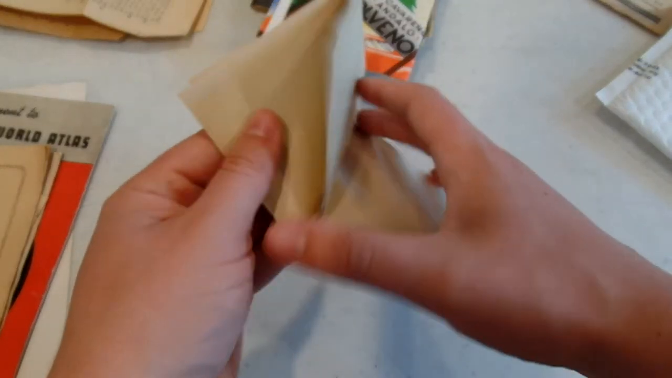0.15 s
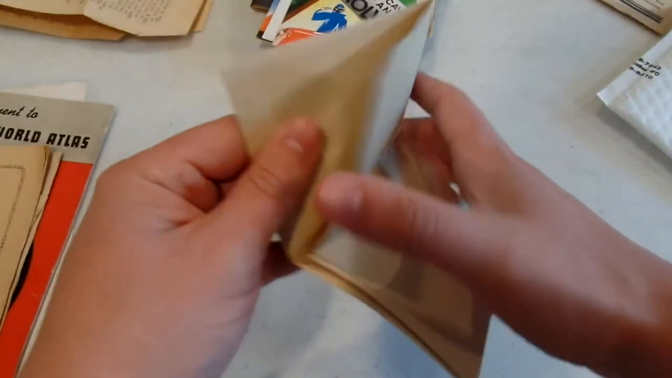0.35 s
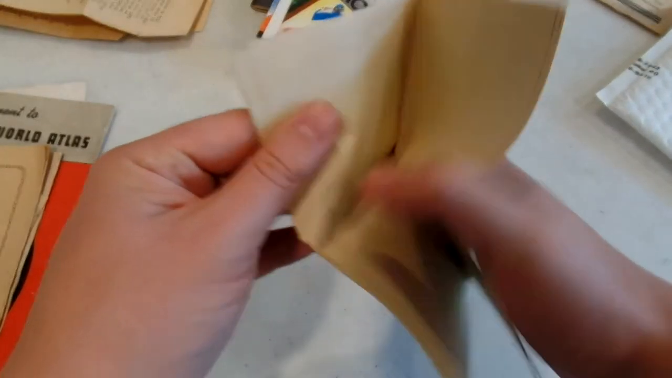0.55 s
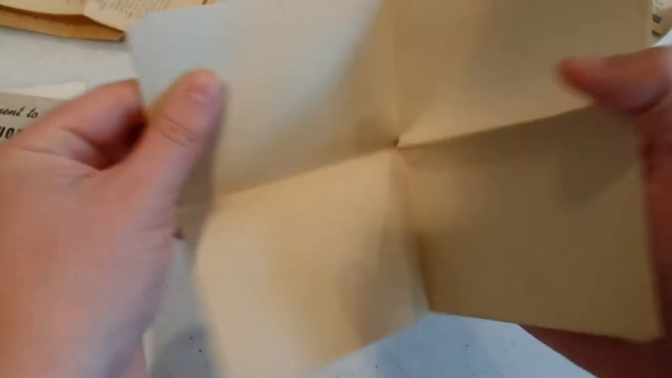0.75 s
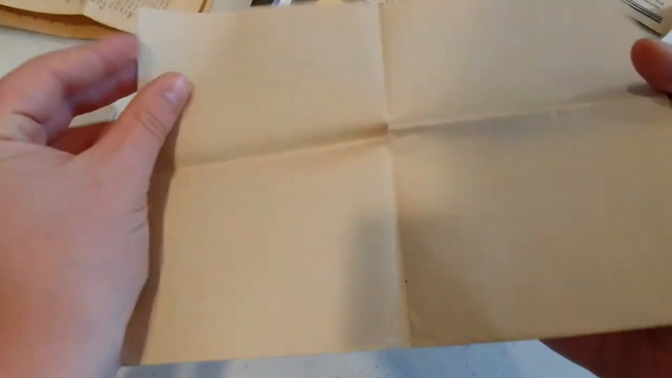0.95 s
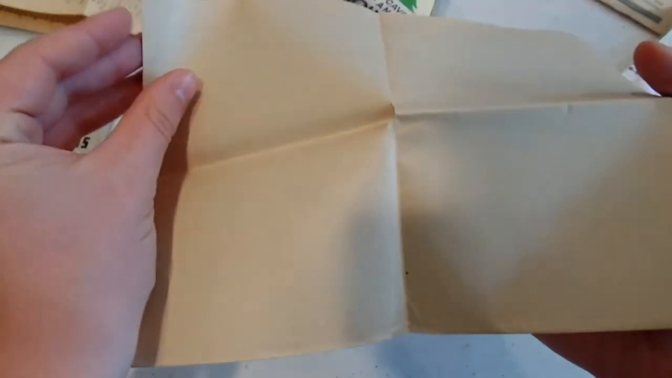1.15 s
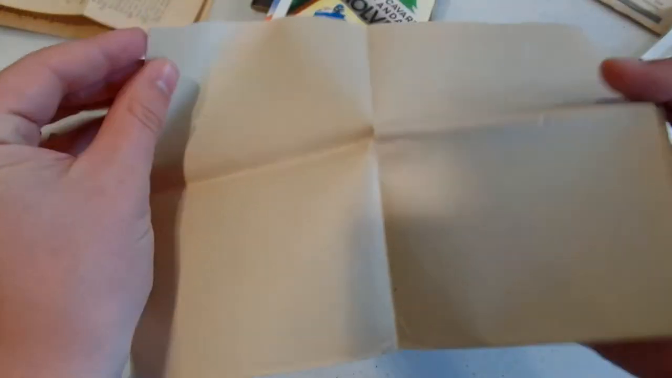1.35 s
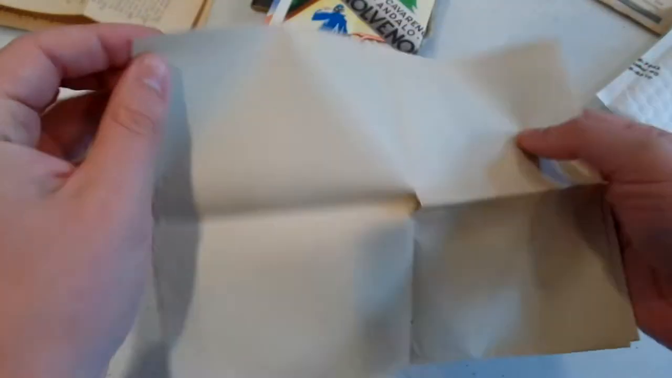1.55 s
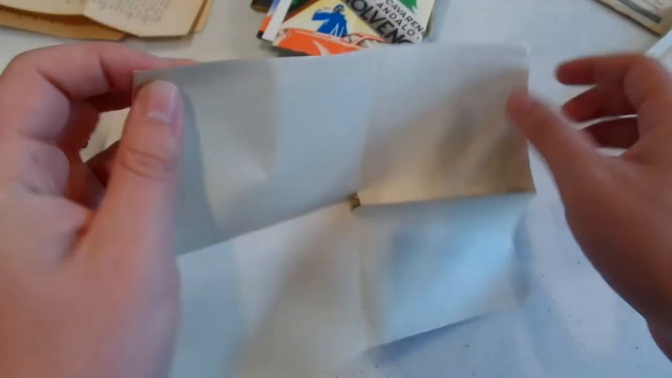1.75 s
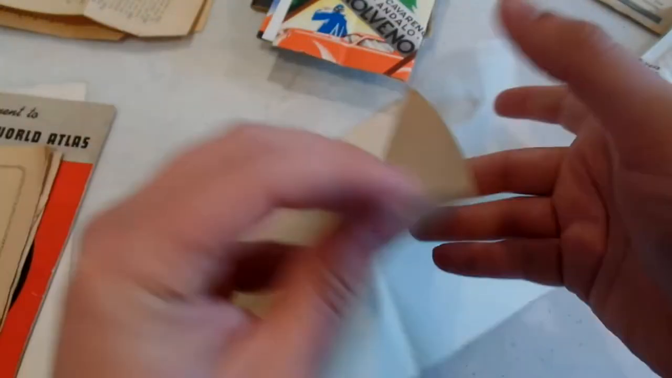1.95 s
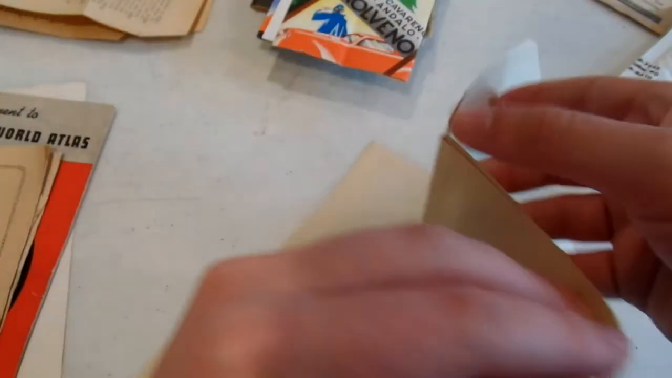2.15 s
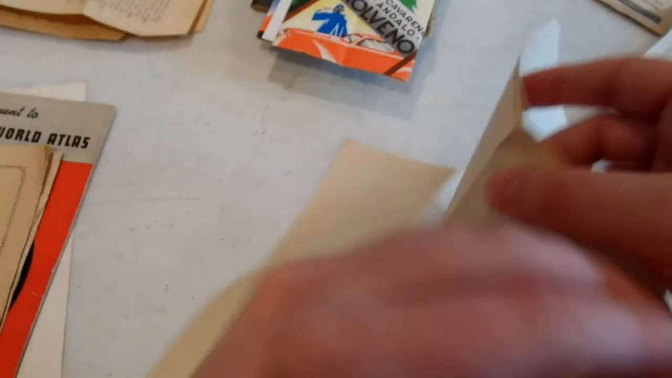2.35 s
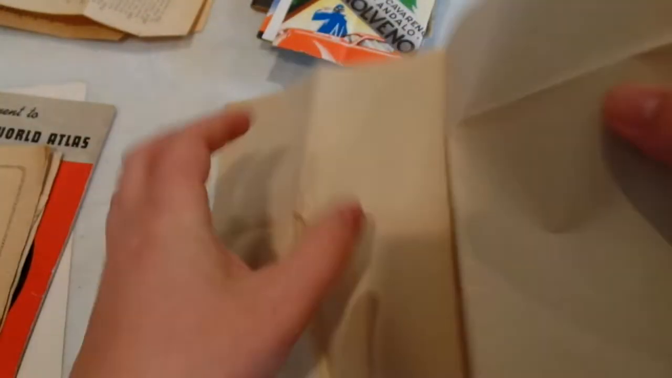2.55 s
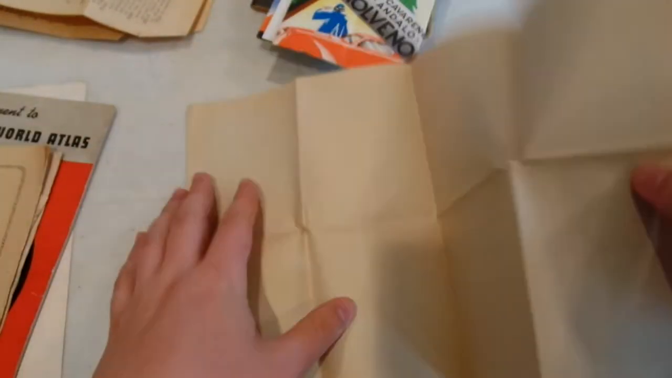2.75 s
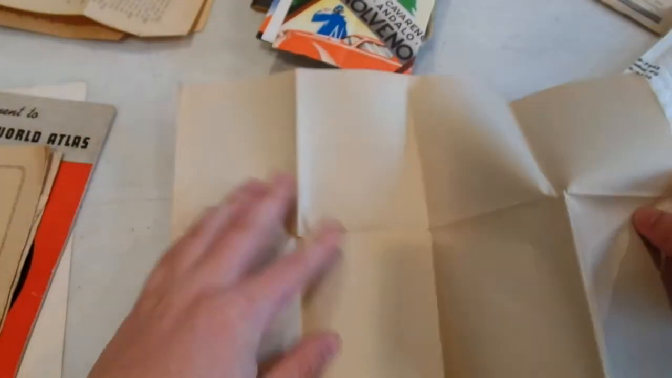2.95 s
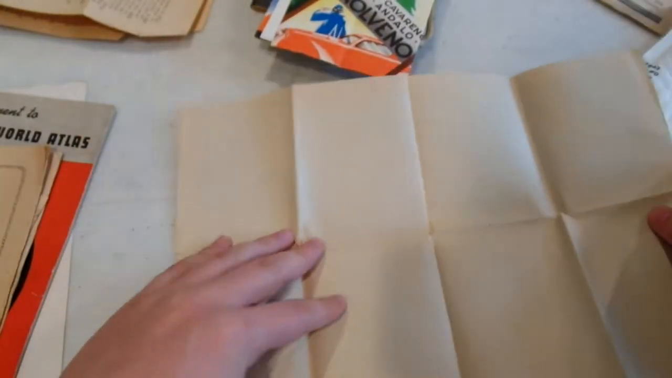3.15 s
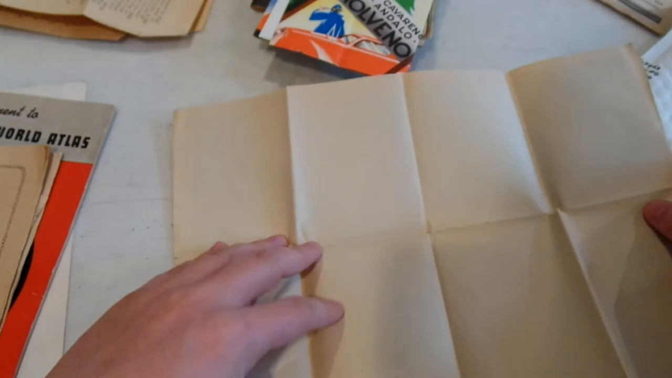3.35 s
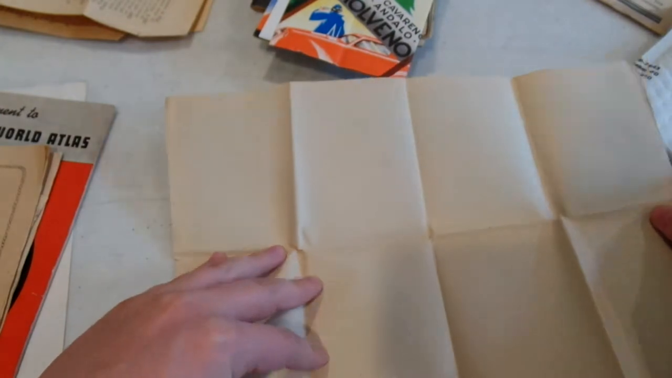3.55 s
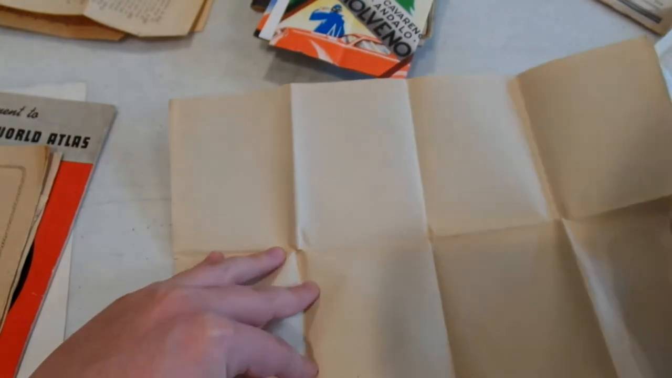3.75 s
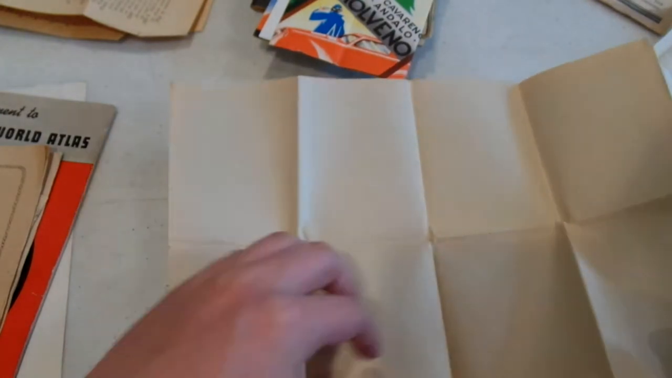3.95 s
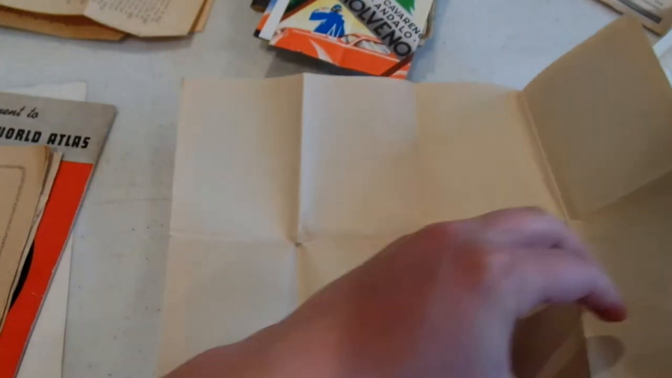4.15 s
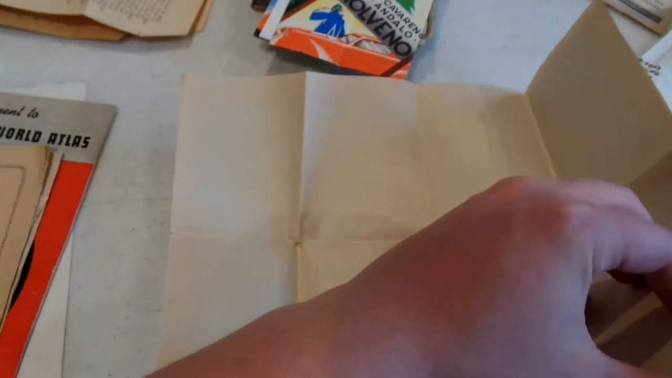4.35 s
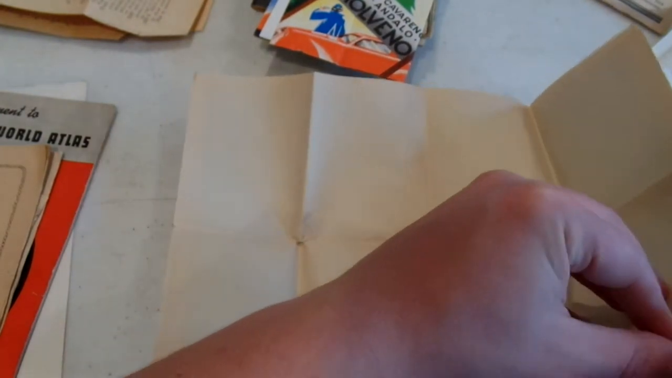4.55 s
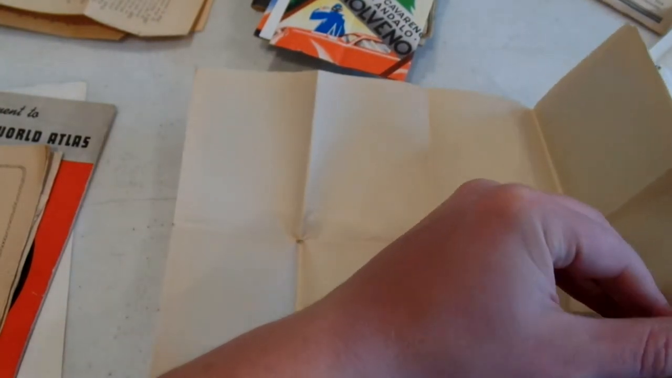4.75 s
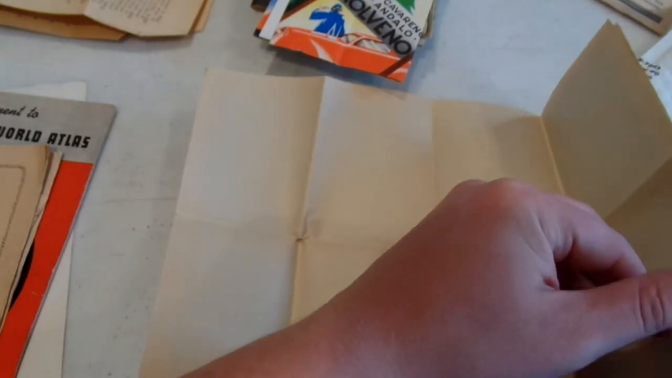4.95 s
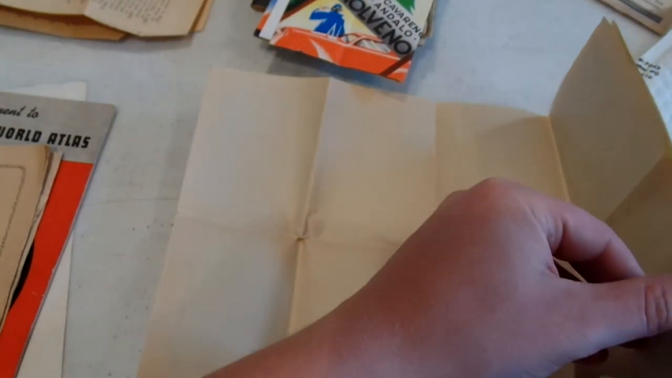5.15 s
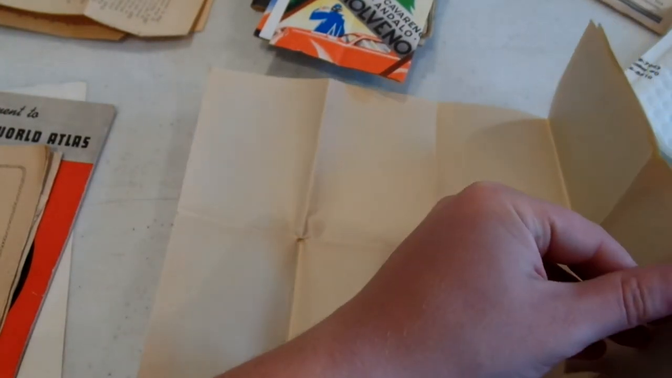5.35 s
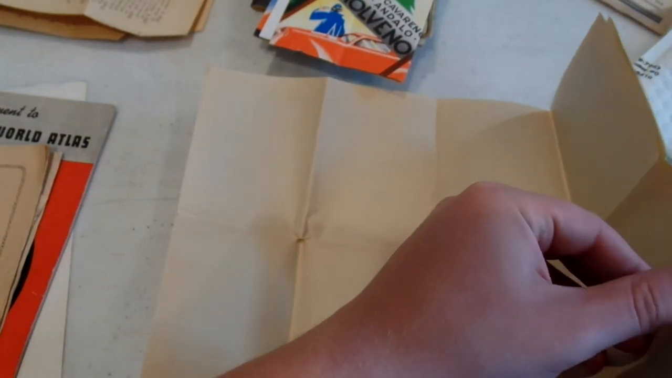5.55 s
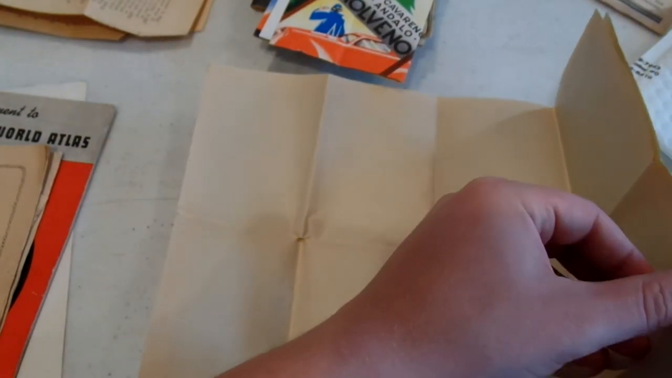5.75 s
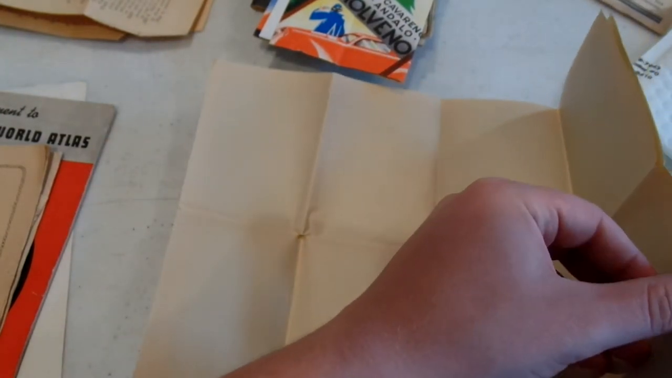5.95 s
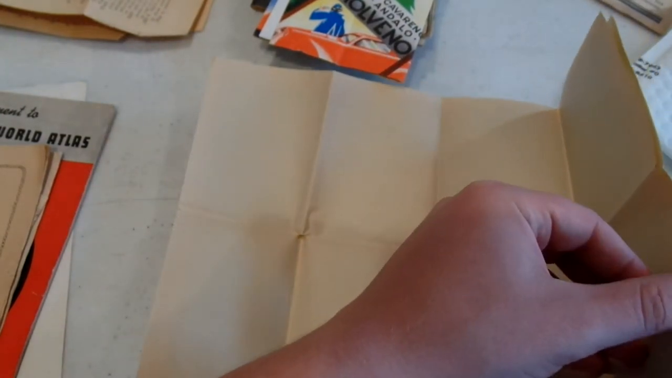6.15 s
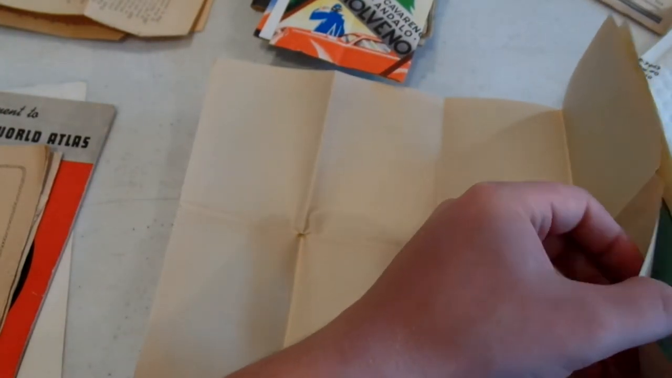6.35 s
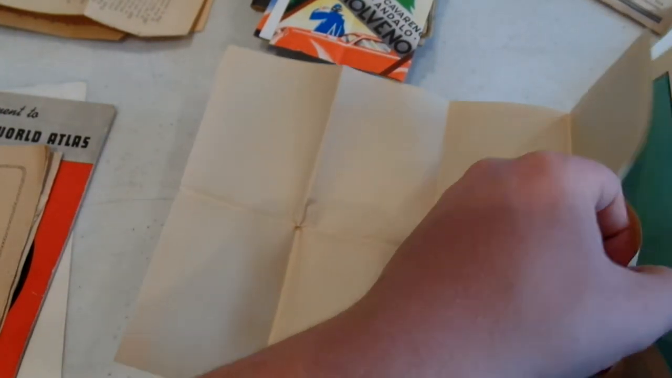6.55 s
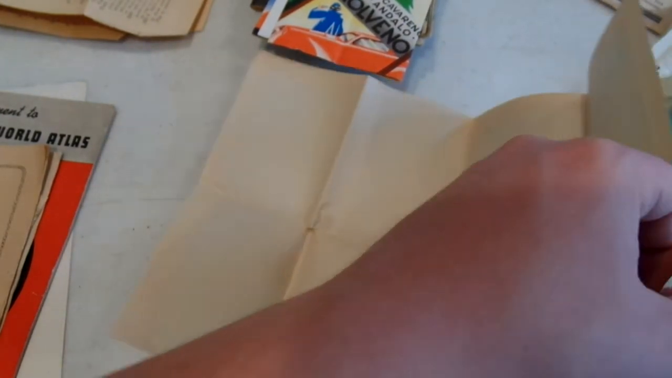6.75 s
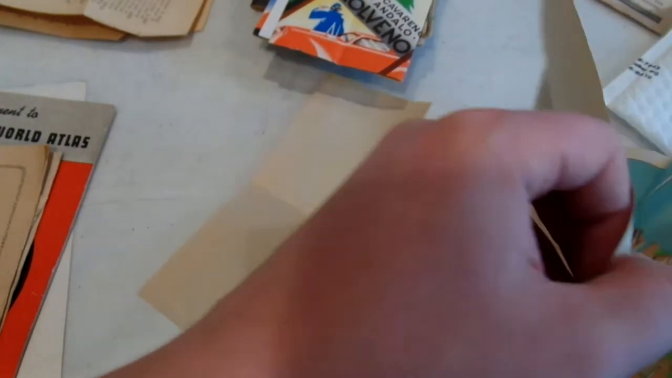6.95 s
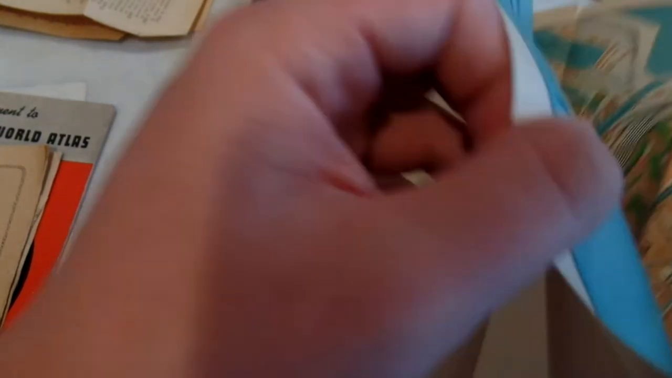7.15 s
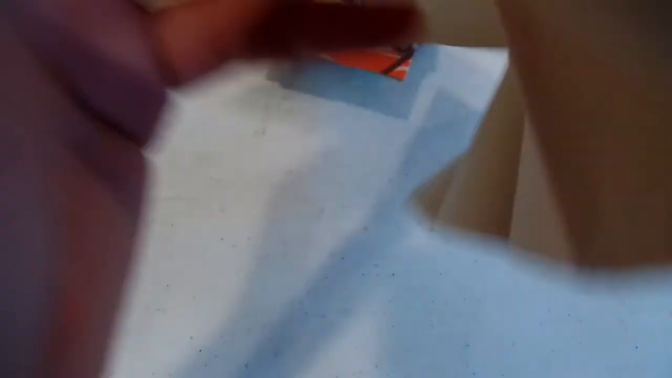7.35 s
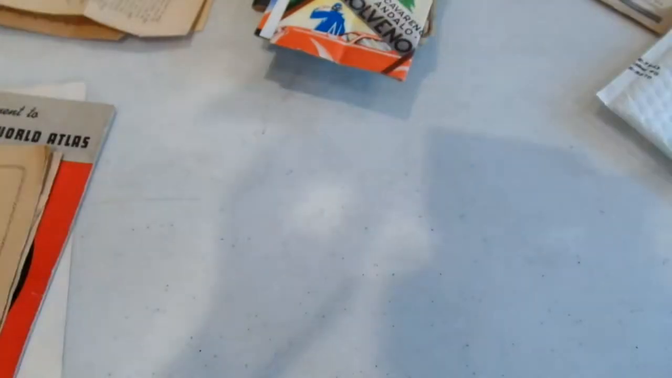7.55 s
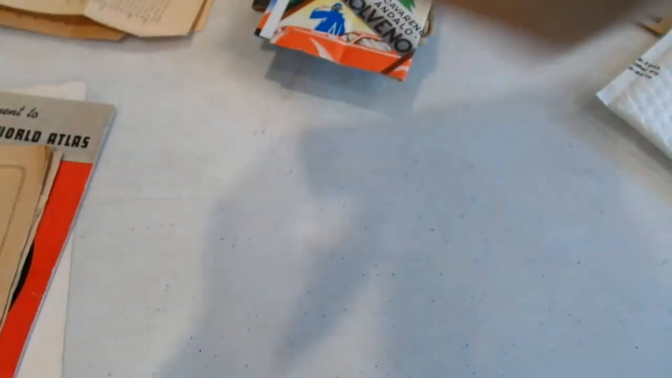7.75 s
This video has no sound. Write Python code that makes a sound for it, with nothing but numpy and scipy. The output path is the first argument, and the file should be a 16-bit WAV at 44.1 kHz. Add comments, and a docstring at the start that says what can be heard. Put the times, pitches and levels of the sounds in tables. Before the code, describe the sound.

Close dry paper rustling in fits and starts, with crisp crease pops, a brief fingertip squeak, a quiet lull and a busy crackly finish.

```python
"""Paper hisses and rustles stroke by stroke, with dry snaps, soft taps and short fingertip squeaks.
A folded sheet is opened out, smoothed on a table and lifted away, close to one microphone.
Friction is filtered noise with ticks; creases and taps are decaying noise bursts that excite resonances;
a skidding fingertip adds stick-slip tones. Swings of the sheet add low noise from fanned air and flexing.
A short diffuse reverberation and steady background noise make up the small quiet room."""
import sys
import numpy as np
from scipy import signal
from scipy.io import wavfile
from scipy.ndimage import uniform_filter1d

SR = 44100
rng = np.random.default_rng(int(sys.argv[2]) if len(sys.argv) > 2 else 0)


def digitize_waveform(pressure):
    """Quantize a signal to 16-bit integers and store it at the path in sys.argv[1].

    Rows of a 2-D input are taken as channels; values are limited to [-1, 1].
    """
    field = np.atleast_2d(pressure).T
    bounded = np.clip(field, -1, 1)
    quanta = np.round(bounded * 32767).astype(np.int16)
    wavfile.write(sys.argv[1], SR, quanta)


N = 344421
TIME = np.arange(N) / SR  # s

# Table levels are relative: each source may add its own trim in dB.
# Strokes of paper over paper, skin or table: [start t/s, rise t/s, hold t/s, time to fall by 20 dB t/s,
# friction level/dB, fizz re friction level/dB, hollow body re friction level/dB].
# The folds are pulled open; from 2.65 s the sheet is laid down and smoothed; from 4.56 s the fingers
# feel for a grip on the edge; from 6.45 s the sheet is gathered up and lifted away.
STROKES = [ (0.0, 0.00167, 0.0155, 0.36, -40, -3, -4.5), (0.084, 0.041, 0.018, 0.3, -44, -3, -3.5),
           (0.17, 0.056, 0.14, 0.2, -46.5, 1.5, -3.5), (0.372, 0.053, 0.046, 0.3, -45, -11, -8),
           (0.493, 0.022, 0.047, 0.14, -38, -4, -8), (0.647, 0.096, 0.062, 0.24, -42, -4, -4),
           (0.82, 0.0368, 0.0578, 0.1158, -39.5, 1.5, -6), (0.929, 0.086, 0.1503, 0.07, -42.5, -6.5, -8.5),
           (1.242, 0.13, .045, 0.43, -38, -4, -4.5), (1.444, 0.057, 0.009, 0.1053, -32.5, -2.5, -10),
           (1.533, 0.0613, 0.0618, .13, -33, -4.5, -4), (1.717, 0.034, 0.051, 0.26, -42.5, -2.5, -4.5),
           (1.924, 0.12, 0.025, 0.3253, -41.5, -4.5, -2), (2.12, 0.0436, 0.0195, .33, -44.5, -1.5, -4.5),
           (2.285, 0.024, 0.2164, 0.18, -40.5, -4, -4.5), (2.653, 0.057, 0.072, 0.21, -36.5, -6, 0.5),
           (2.858, 0.0593, 0.085, .18, -36.5, -6, -5), (3.046, 0.067, 0.12, 0.4, -43.5, -4, -1),
           (3.257, .015, .015, .09, -39.5, -4, -14), (3.337, 0.1, 0.075, 0.24, -39.5, -4, -3),
           (3.559, 0.082, 0.076, 0.2, -47, -8, -1), (3.802, 0.035, .06, 0.17, -43, -4.5, -1.5),
           (4.297, 0.058, 0.018, 0.06, -44, -9, -8), (4.395, 0.0428, 0.068, .17, -41, -7, -6),
           (4.56, 0.024, 0.21, 0.04, -56.5, -6, -2), (4.815, 0.055, .07, 0.35, -51.5, -6, -6),
           (5.076, 0.0376, 0.042, .1, -54, -11, 3), (5.193, 0.036, .008, 0.06, -50.5, -2.5, -7),
           (5.304, 0.0162, .003, 0.2, -52, -6.5, -1.5), (5.393, 0.007, 0.012, 0.1458, -39.5, 0, -3),
           (5.50, 0.017, 0.015, 0.2, -45, -7, -6), (5.634, .035, .012, 0.2, -48.5, -0.5, -5.5),
           (5.74, 0.018, .015, 0.24, -50.5, 1, -4), (5.873, 0.0191, 0.0075, 0.13, -41.5, -1.5, -4.5),
           (5.95, 0.027, .04, 0.12, -54.5, -10, -6), (6.052, 0.0263, .012, 0.04, -50.5, -2.5, -7),
           (6.194, .015, 0.035, .25, -58, -5.5, 2), (6.283, 0.018, 0.12, 0.35, -50, -3.5, -8),
           (6.446, 0.0104, 0.063, 0.1548, -35.5, -3, -6.5), (6.54, .01, .015, 0.15, -35, -4, -8),
           (6.621, .015, .005, .16, -30, -8, -7), (6.714, 0.048, .13, 0.2, -36, -3.5, -6),
           (6.91, 0.058, .085, 0.7, -39.5, -11, -0.5), (7.068, .11, .17, 0.0848, -32, -3, -3),
           (7.366, 0.028, 0.25, .16, -32.5, -5.5, -2.5)]
# The sheet never quite rests in the hand: [friction level/dB, fizz re friction level/dB,
# hollow body re friction level/dB]
HELD_SHEET = (-63, -5, 3.8)
# Spectrum of paper friction: [f/Hz, spectral density level/dB]
FRICTION_SPECTRUM = [(200, -7), (400, -0.5), (540, -4), (850, 1), (1200, -2), (1900, 0.5), (2600, -1),
                     (4000, 3.5), (7200, 1.5), (8200, 0), (9800, -7), (12000, -7), (14500, -1), (16000, -8)]
# The widest free panel, a resonance in the friction: [t/s, f/Hz, lift level/dB]
PANEL_RESONANCE = [(0, 2310, 2.5), (2.6, 2660, -0.5), (3.7, 2620, 10), (4.2, 2560, 0.5), (4.4, 3180, 3),
                   (6.4, 3130, 6), (7, 2680, 1)]
# Creases that buckle: [t/s, level/dB, panel ring f/Hz, thud level/dB, crack level/dB, decay constant t/s]
SNAPS = [(0.553, -32, 5500, -7.5, -18, .0057), (0.727, -32, 830, -2, -12, .0064),
         (0.7396, -35.5, 7550, -4, -5, 0.0025), (0.8869, -24, 8600, -1.5, 5, 0.00076),
         (1.3917, -30, 4000, -2.5, -3, 0.0042), (1.4854, -33, 3060, -18, -9, 0.0023),
         (1.5091, -19, 5300, -14, 1.5, 0.0021), (1.5709, -25.5, 960, 3, -11, 0.0018),
         (1.642, -34, 5000, -15.5, -7, 0.0023), (2.2517, -38, 2890, 5, -10.5, 0.0031),
         (2.3142, -33, 2610, -4, -14, .0046), (2.411, -40.5, 2480, -1, -8.5, 0.0027),
         (2.6731, -27.5, 1550, 1.5, -12, 0.0016), (2.721, -28, 2360, -14, -5, 0.0066),
         (2.7852, -23.5, 3180, -8, -8, 0.0029), (2.8126, -32, 1000, 8.5, -12, .0099),
         (2.8504, -22.5, 2990, -7, -3.5, 0.0031), (2.9421, -23.5, 8350, -10, 1, 0.0026),
         (2.981, -19, 2830, -5.5, -0.5, 0.0033), (3.2683, -24, 3800, -10.5, -4, 0.0021),
         (3.438, -25, 2600, 9, -10.5, .0054), (3.4927, -19.5, 2520, -14, -7.5, 0.0017),
         (3.8187, -22.5, 2605, -6.5, -12, 0.0068), (3.8974, -37.5, 2510, 0, -10, 0.003),
         (3.9424, -41.5, 2510, -6, -14, 0.0016), (4.116, -50, 2200, 2.5, -17, .004),
         (4.4795, -28.5, 3040, -7.5, -12, .0029), (4.735, -40.5, 2240, 3.5, -18, 0.003),
         (5.1227, -40, 3060, -3, -14.5, 0.0027), (5.403, -30, 4390, -16, -1.5, 0.011),
         (5.4374, -34, 3120, -4, 0, .0059), (5.482, -39, 2150, -1, -16, .0043),
         (5.6133, -37, 2500, -10, -20, .005), (5.8979, -30, 3370, -10.5, 0.5, 0.0071),
         (6.4525, -22, 4050, -8.5, 0, 0.0042), (6.5383, -19, 3400, -2.5, 2, 0.0036),
         (6.629, -17.5, 2840, -3.5, 2, 0.0035), (6.6589, -25, 2830, -2, -7.5, .0054),
         (6.7535, -17.5, 2110, -8.5, -9.5, 0.0047), (6.914, -32.5, 1600, 14, -7, .004),
         (6.9848, -27.5, 3400, -0.5, -13, .0042), (7.0294, -26.5, 1720, -3, -1, 0.0056),
         (7.1676, -30.5, 2420, -3, -10, 0.0022), (7.187, -28.5, 2980, -2, 4, .0043),
         (7.247, -20, 4100, -26, -22, 0.0019), (7.2921, -22.5, 7640, -2, -7, 0.0044),
         (7.3035, -19, 2150, -13, 0, .004), (7.33, -29, 6460, -6, 6, .0005),
         (7.3466, -25, 4640, -13.5, -16, 0.0035), (7.4675, -24.5, 8130, -32, -2, 0.0021),
         (7.5291, -26.5, 3270, -28, -4, .0027), (7.5443, -30, 6270, -11, 0.5, 0.0024),
         (7.573, -30, 5500, -13, 19.5, 0.0019), (7.654, -16.5, 4370, -5, -4, 0.0027),
         (7.706, -22.5, 5760, -25, -6, 0.0039), (7.733, -21, 4400, -16, 1.5, 0.0011),
         (7.774, -18, 6850, -8.5, 4, 0.0015)]
# Spectrum of a buckling crease: [f/Hz, spectral density level/dB]
CREASE_SPECTRUM = [(100, -9.5), (400, -3), (950, 6.5), (1400, 4.5), (2600, 11.5), (4500, 9), (8000, 3.5),
                   (10000, -5), (15000, -4.5)]
# Fingers and sheet land on the table: [t/s, level/dB, push of the hand re knock level/dB]
TAPS = [(.034, -40.5, 4.5), (2.689, -37, -17), (2.714, -33, -21), (2.787, -31.5, -14), (2.814, -32, -13),
        (5.9, -42.5, 16.5), (7.1, -32, -6), (7.656, -35.5, -10)]
# Modes of the sheet pressed on the table: [f/Hz, bandwidth f/Hz, level/dB]
PRESSED_MODES = [(456.8, 26, -3), (701, 60, -9.5), (815, 48, -3.5), (867, 38, -3.5), (954, 43, -0.5),
                 (1250, 91, -9.5)]
# A fingertip skids over the sheet: [start t/s, rise t/s, hold t/s, level/dB]
SKIDS = [(3.423, 0.0092, 0.079, -27.5), (3.447, 0.00476, .002, -15), (3.458, 0.0055, .002, -14.5),
         (7.098, 0.0077, 0.042, -35.5)]
# Wide swings of the whole sheet: [start t/s, rise t/s, hold t/s, fanned air level/dB, flexing level/dB]
SWINGS = [(0.51, .055, .03, -69, -46), (0.95, 0.29, 0.18, -61, -58), (1.42, 0.095, 0.084, -50.5, -47),
          (1.676, 0.06, .04, -50, -65), (2.62, 0.04, 0.17, -61, -42.5), (6.3, 0.19, .5, -66.5, -66),
          (7.126, 0.169, 0.41, -55, -40)]
# Reverberation time of the room: [f/Hz, time to fall by 60 dB t/s]
ROOM_DECAY = [(200, 0.3), (1000, 0.49), (3000, 0.23), (8000, 0.098), (15000, 0.5)]
# Spectrum of the reverberation: [f/Hz, level/dB]
ROOM_SPECTRUM = [(100, -11.5), (500, 2), (3000, 1), (7000, 4.5), (15000, -13)]
# Spectrum of the still room: [f/Hz, spectral density level/dB]
AMBIENCE_SPECTRUM = [(25, -17), (70, -11), (120, 3), (280, 0), (500, -9.5), (1000, -14), (2500, -17),
                     (8000, -23.5), (15000, -26)]

AMBIENCE_DB = -56  # rms level/dB
PANEL_RING_DB = 1.5  # ring of the panel re breaking fibres, level/dB
SWING_RELEASE_S, SKID_RELEASE_S = .2, 0.014  # time to fall by 20 dB, t/s
# Every stroke also bends the sheet: air and flexing level/dB at a friction of FIRM_DB, less when softer
FIRM_DB = -40
STROKE_AIR_DB, STROKE_FLEX_DB, BEND_DB_PER_DB = -66, -49.5, .5
EDGE_HZ = 16000  # upper band limit f/Hz


def friction(catches_per_s=700, spread_db=3.0, catch_db=-10, flicker_db=1.37,
             body_db=-1.0, rasp_db=-1.0, fizz_db=1.5):
    """Sliding friction: countless fibres rub as a hiss; larger ones catch and let go as tiny ticks."""
    level, fizz, body = sliding()
    catch_times = rng.random(N) < catches_per_s / SR
    catch_sizes = amp(spread_db * np.minimum(rng.exponential(1, N), 4))
    catches = catch_times * rng.choice([-1, 1], N) * catch_sizes
    rub = rng.standard_normal(N) + amp(catch_db) * evened(catches)
    rub *= amp(flicker_db * waver(140))
    rub = bend(colour(rub, FRICTION_SPECTRUM))
    # a free panel radiates the low part, sharp edges the top
    hollow_body = amp(body + body_db) * evened(band(rub, 270, 2050))
    rasp = amp(rasp_db) * evened(band(rub, 2350, 9420, order=5))
    fine_fizz = amp(fizz + fizz_db) * evened(band(rub, 9110, SR / 2, order=5))
    return amp(level) * (hollow_body + rasp + fine_fizz)


def sliding():
    """Addition of powers: friction level of all strokes, with fizz and body relative to it (dB)."""
    held_db, held_fizz_db, held_body_db = HELD_SHEET
    rub = np.full(N, amp(held_db) ** 2)
    fizz = rub * amp(held_fizz_db) ** 2
    body = rub * amp(held_body_db) ** 2
    for *move, fizz_db, body_db in STROKES:
        power = gesture(*move)
        rub += power
        fizz += amp(fizz_db) ** 2 * power
        body += amp(body_db) ** 2 * power
    return 10 * np.log10([rub, fizz / rub, body / rub])


def gesture(start, rise, hold, release, level_db):
    """Envelope of power: a move of the hand speeds up linearly, holds and dies away exponentially."""
    t = np.arange(0, rise + hold + 4 * release, 1 / SR)
    power = np.zeros(N)
    speed_up = np.minimum(t / max(rise, 1 / SR), 1)
    die_away = amp(-20 * np.maximum(t - rise - hold, 0) / release)
    add(power, start, (amp(level_db) * speed_up * die_away) ** 2)
    return power


def bend(x, panel_width_hz=260, patch_rms_db=1.7):
    """Time-varying resonance: as the sheet changes shape, its many resonances swell and fade."""
    hz, t, z = signal.stft(x, SR, nperseg=512)
    patches = rng.standard_normal(z.shape)
    for _ in range(2):
        patches = uniform_filter1d(patches, size=5, axis=0)  # over frequency
        patches = uniform_filter1d(patches, size=26, axis=1)  # over time
    s, pitch_hz, lift_db = np.transpose(PANEL_RESONANCE)
    detuning = (hz[:, None] - np.interp(t, s, pitch_hz)) / panel_width_hz
    panel_db = np.interp(t, s, lift_db) / (1 + detuning ** 2)
    gain = amp(patch_rms_db * evened(patches) + panel_db)
    return signal.istft(z * gain, SR, nperseg=512)[1][:N]


def creases(gain_db=-7.0):
    """Buckling instability: stiff creases give way one by one, each with a dry snap."""
    out = np.zeros(N)
    for s, level_db, ring_hz, *blow in SNAPS:
        add(out, s, snap(level_db, ring_hz, PANEL_RING_DB, *blow))
    return amp(gain_db) * out


def snap(level_db, ring_hz, ring_db, thud_db, crack_db, settle,
         ring_width_hz=480, thud_slower=2.35, crack_faster=0.667, size=2048):
    """Impulsive excitation: a burst of fibre breaks sets the panel beside it ringing briefly."""
    t = np.arange(size) / SR
    breaks = colour(rng.standard_normal(size), CREASE_SPECTRUM)

    def burst(life):
        """Exponential decay of the fibre breaks."""
        return breaks * np.exp(-t / max(life, 1e-4))

    core = evened(band(burst(settle), 1435, 4000, order=2))
    ring = evened(resonate(burst(settle / 2), ring_hz, ring_width_hz))
    thud = evened(band(burst(settle * thud_slower), 217, 1670, order=2))
    crack = evened(band(burst(settle * crack_faster), 5830, SR / 2, order=2))
    sound = evened(core + amp(ring_db) * ring)
    sound = sound + amp(thud_db) * thud + amp(crack_db) * crack
    return amp(level_db) * evened(sound)


def crinkle(ticks_per_s=70, spread_db=3.0, gain_db=-8, life=0.0024, count=12, size=512):
    """Random point process: wrinkles pop as the sheet moves, each in a patch with its own pitch."""
    t = np.arange(size) / SR
    out = np.zeros(N)
    for hz in np.geomspace(1300, 8000, count):
        tick = evened(band(rng.standard_normal(size) * np.exp(-t / life), hz / 2, hz * 2, order=1))
        pop_times = rng.random(N) < ticks_per_s / count / SR
        pops = pop_times * amp(spread_db * np.minimum(rng.exponential(1, N), 3))
        out += signal.oaconvolve(pops, tick)[:N]
    return amp(sliding()[0] + gain_db) * evened(out)


def taps(contact=0.0028, push_life=0.017, gain_db=-6.5, size=4096):
    """Modal excitation: a touch knocks the sheet against the table, over the low push of the hand."""
    t = np.arange(size) / SR
    out = np.zeros(N)
    for s, level_db, push_db in TAPS:
        touch = rng.standard_normal(size)
        knock = pressed_sheet(touch * np.exp(-t / contact))
        knock = evened(band(knock, 240, 2400, order=2))
        push = evened(band(touch * np.exp(-t / push_life), 149, 290, order=2))
        add(out, s, amp(level_db) * evened(knock + amp(push_db) * push))
    return amp(gain_db) * out


def pressed_sheet(force):
    """Modal superposition: the sheet on the table answers a force with several damped modes."""
    return sum(amp(db) * evened(resonate(force, hz, width)) for hz, width, db in PRESSED_MODES)


def fingertip(slip_hz=967, slip_jitter=.04, scuffs_per_s=1500, scuff_db=-2):
    """Stick-slip: skin grips and slips almost regularly, with a hollow groan of the pressed sheet."""
    power = sum(gesture(start, rise, hold, SKID_RELEASE_S, level_db)
                for start, rise, hold, level_db in SKIDS)
    force = np.sqrt(power)
    slip_rate = slip_hz * (1 + slip_jitter * waver(400))
    squeak = np.sin(2 * np.pi * np.cumsum(slip_rate) / SR)
    scuffs = (rng.random(N) < scuffs_per_s / SR) * rng.standard_normal(N)
    groan = evened(band(pressed_sheet(scuffs), 380, 3000, order=2))
    grip = force / force.max()  # the firmer the touch, the more regular the slips
    return force * (grip * squeak + amp(scuff_db) * (1 - grip / 2) * groan)


def swing(air_db=1.0, flex_db=-3):
    """Air displacement and bending: the sheet pushes air at the microphone and flutters softly."""
    air, flex = swinging()
    wind, flutter = rng.standard_normal((2, N))
    fanned_air = amp(air + air_db) * evened(band(wind, 23.6, 74, order=2))
    flexing = amp(flex + flex_db) * evened(band(flutter, 94, 404, order=2))
    return fanned_air + flexing


def swinging():
    """Addition of powers: levels (dB) of fanned air and flexing, from strokes and wide swings."""
    bending_db = BEND_DB_PER_DB * (sliding()[0] - FIRM_DB)
    air = amp(STROKE_AIR_DB + bending_db) ** 2
    flex = amp(STROKE_FLEX_DB + bending_db) ** 2
    for start, rise, hold, air_db, flex_db in SWINGS:
        air += gesture(start, rise, hold, SWING_RELEASE_S, air_db)
        flex += gesture(start, rise, hold, SWING_RELEASE_S, flex_db)
    return 10 * np.log10([air, flex])


def room(x, build=0.00053, size=22050):
    """Diffuse reverberation: a short noise tail decays at a rate that depends on frequency."""
    hz, t, z = signal.stft(rng.standard_normal(size), SR, nperseg=256)
    decay = amp(-60 * t / read(ROOM_DECAY, hz)[:, None])
    tail = signal.istft(z * decay, SR, nperseg=256)[1]
    tail *= np.minimum(np.arange(len(tail)) / SR / build, 1)
    return signal.fftconvolve(x, colour(tail / np.linalg.norm(tail), ROOM_SPECTRUM))[:N]


def still_room():
    """Stationary noise: the quiet room is heard as a steady, mostly low background."""
    return amp(AMBIENCE_DB) * evened(colour(rng.standard_normal(N), AMBIENCE_SPECTRUM))


def amp(db):
    """Level definition: decibels to amplitude gain."""
    return 10 ** (np.asarray(db) / 20)


def evened(x):
    """Normalisation: scales to rms 1."""
    return x / np.sqrt(np.mean(x ** 2) + 1e-20)


def read(points, hz):
    """Interpolation of a table on a logarithmic frequency axis."""
    f, value = np.transpose(points)
    return np.interp(np.log(hz + 1), np.log(f + 1), value)


def add(mix, s, sound):
    """Superposition: adds a sound to the mix in place at time s."""
    part = mix[round(s * SR):][:len(sound)]
    part += sound[:len(part)]


def colour(x, points, size=2048):
    """Minimum-phase filtering: a causal filter with the given spectrum keeps attacks sharp."""
    log_gain = np.log(amp(read(points, abs(np.fft.fftfreq(size, 1 / SR)))))
    impulse_response = np.fft.ifft(np.exp(np.conj(signal.hilbert(log_gain)))).real
    return signal.oaconvolve(x, impulse_response)[:len(x)]


def band(x, lo_hz, hi_hz, order=3):
    """Band-pass filtering, with the upper edge kept below half the sampling rate."""
    edges = [lo_hz, min(hi_hz, SR / 2 - 1000)]
    return signal.sosfilt(signal.butter(order, edges, "band", fs=SR, output="sos"), x)


def resonate(x, hz, width):
    """Damped oscillation: one mode as a complex one-pole resonator."""
    pole = np.exp((2j * np.pi * hz - np.pi * width) / SR)
    return signal.lfilter([1], [1, -pole], x).imag


def waver(per_s):
    """Random modulation: straight lines between random knots, scaled to rms 1."""
    knots = np.arange(0, N / SR + 1, 1 / per_s)
    return evened(np.interp(TIME, knots, rng.standard_normal(len(knots))))


def scene(rub_wet_db=-13, snap_wet_db=-9):
    """Superposition of paper and room at one microphone, the same in both channels."""
    rubbing = friction() + fingertip()
    blows = crinkle() + creases() + taps()  # these set whole panels going and fill the room more
    echo = room(amp(rub_wet_db) * rubbing + amp(snap_wet_db) * blows)
    return np.tile(rubbing + blows + echo + swing() + still_room(), (2, 1))


def record(dry):
    """Band limitation: a linear-phase low-pass at EDGE_HZ."""
    low_pass = signal.firwin(255, EDGE_HZ, window=("kaiser", 8), fs=SR)
    return signal.oaconvolve(dry, low_pass[None], "same")


dry = scene()
out = record(dry)
digitize_waveform(out)
```